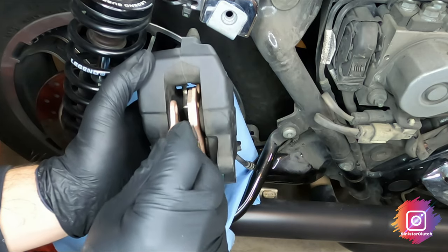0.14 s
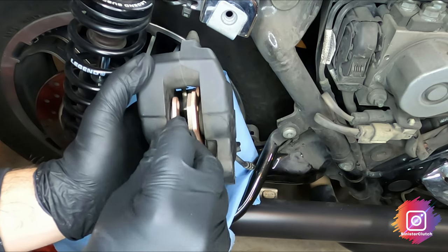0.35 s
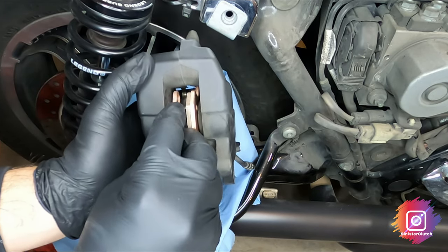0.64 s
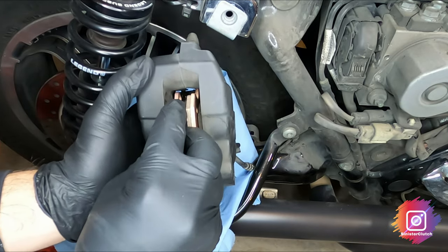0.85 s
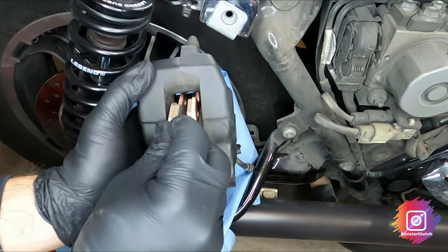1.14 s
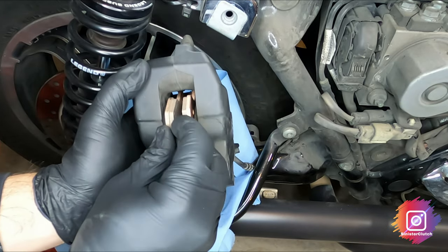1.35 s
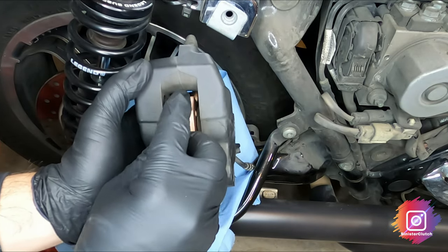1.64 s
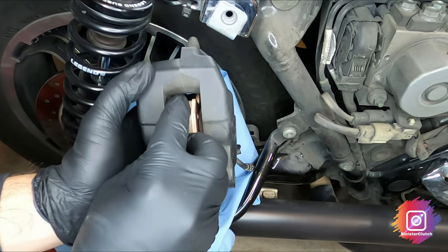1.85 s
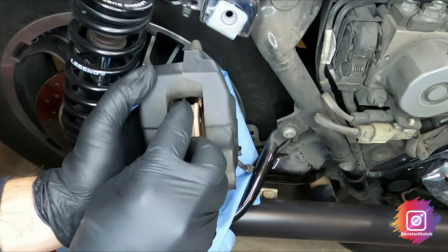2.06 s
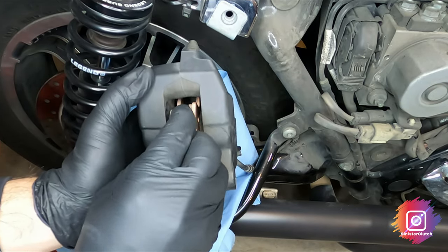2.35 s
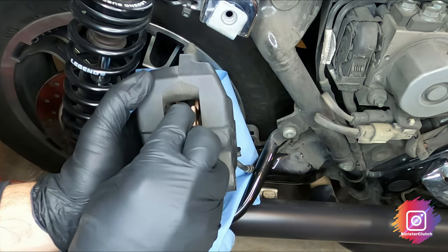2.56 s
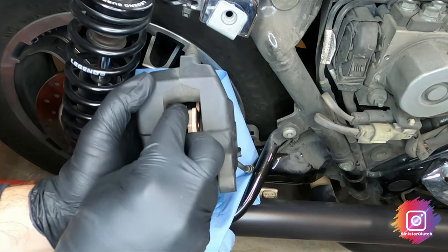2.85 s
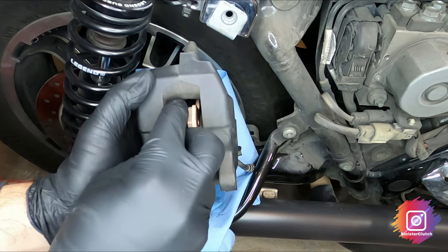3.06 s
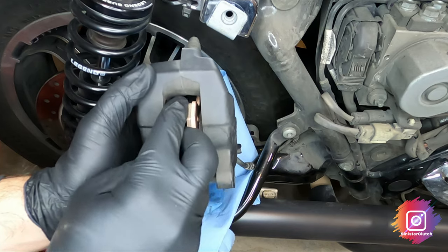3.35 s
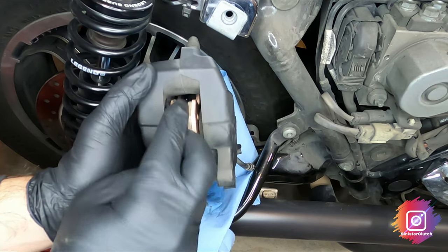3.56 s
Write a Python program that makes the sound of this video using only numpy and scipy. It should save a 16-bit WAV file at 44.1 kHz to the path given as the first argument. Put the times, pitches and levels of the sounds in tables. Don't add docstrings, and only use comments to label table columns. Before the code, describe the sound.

A metal brake pad scrapes and clanks into its caliper, cracks home early, and a spring clip twangs briefly; sparse glove rubs, ticks and soft knocks follow, close-miked in a quiet, faintly humming garage.

```python
import sys
import numpy as np
from scipy import signal
from scipy.fft import rfft, irfft
from scipy.io import wavfile
from scipy.ndimage import uniform_filter1d

SR = 44100
rng = np.random.default_rng(int(sys.argv[2]) if len(sys.argv) > 2 else 0)


def int16_out(signal):
    q = np.round(np.clip(np.atleast_2d(signal).T, -1, 1) * 32767)
    wavfile.write(sys.argv[1], SR, q.astype(np.int16))


def gain_from_db(level_db):
    decades = np.asarray(level_db, float) / 20
    return 10 ** decades


N = 163170
T = np.arange(N) / SR

# (frequency [Hz], density [dB per Hz])
AIR_SPECTRUM = [(25, -4.5), (60, -2), (150, -15), (300, -21.5), (700, -31), (2000, -37), (6000, -41),
                (15000, -45)]
# (frequency [Hz], level [dB], drift [dB/s])
MACHINE_HUM = [(75.4, -60, 0), (99.5, -55, -2), (118.5, -64, 0.82), (144.5, -70.5, 0.22),
               (195.7, -74, -0.34)]
# (time [s], level [dB])
RUMBLE_LEVEL = [(0, -51.5), (.5, -46.5), (.85, -58), (1.35, -38.5), (1.6, -48.5), (2.5, -46.5), (3.0, -39),
                (3.25, -32.5), (3.4, -43.5), (3.55, -36.5), (3.7, -53)]
# (frequency [Hz], width [Hz], level [dB], extra level per pressure [dB/dB])
HELD_PAD_MODES = [(2440, 220, -6.5, 0.4), (3370, 150, -16, 1.5), (5350, 74, -12.5, 1.5),
                  (6590, 110, 7.5, 3), (7900, 82, -1, 1), (8660, 78, -22, -3), (12100, 110, -14, 1),
                  (14000, 210, -24, -2)]
# (time [s], level [dB])
SLIDE_PRESSURE = [(0, -78), (.025, -62), (.05, -72), (.1, -70), (.14, -69), (.16, -60.5), (.18, -67),
                  (.235, -63.5), (.25, -64.5), (.352, -61), (.362, -58), (.402, -57), (.414, -65),
                  (.56, -71), (.7, -70.5), (.76, -63.5), (.79, -68), (.85, -110)]
# (frequency [Hz], level [dB], T60 [s])
FREE_PAD_MODES = [(2500, -41, .07), (3200, -17, 0.078), (3500, -4, 0.051), (4790, -21, .2),
                  (5600, -14.5, 0.056), (6570, 1.5, 0.02), (7585, -5.5, 0.03), (7900, -4, 0.035),
                  (8390, -15.5, 0.13), (9352, -26, 0.17), (10930, -21, 0.15), (12500, -22, .04),
                  (14100, -15, .06)]
# (time [s], crack level [dB], crack centre [Hz], ring level [dB], shim level [dB])
PAD_CLANKS = [
    (0.1435, -54, 2000, -80, -82),
    (0.2018, -66, 2000, -74, -70),
    (0.2158, -40, 2220, -63, -75),
    (0.2945, -49, 2280, -72, -67.5),
    (0.4154, -28.5, 2840, -34, -51.5),
    (0.4227, -38, 1580, -51, -68),
    (1.3128, -37.5, 2300, -80, -61),
    (2.284, -48, 1860, -81, -82),
    (2.6928, -44, 3220, -85, -76),
    (3.696, -46.5, 2160, -83, -61),
]
# (frequency [Hz], width [Hz], level [dB])
SHIM_MODES = [(1150, 940, -9.5), (2530, 740, -6.5), (3270, 210, 3), (3440, 240, 3), (3750, 240, -2),
              (4250, 260, -13)]
# (time [s], frequency
# [Hz], level [dB], T60 [s])
STEEL_RINGS = [(0.1434, 2330, -53.5, 0.069), (.1435, 2000, -61, .15), (.1435, 1360, -64.5, .3),
               (.1435, 6370, -60, 0.046), (.1435, 9000, -66, .1), (.1655, 6260, -62, 0.025),
               (.2017, 2330, -54, .08), (0.202, 1760, -57, 0.025), (.2017, 7900, -72, 0.059),
               (.2017, 5200, -59, .012), (.2156, 2390, -45, 0.032), (.2156, 2020, -59, 0.11),
               (.2165, 6270, -49.5, 0.032), (.2165, 5200, -61, 0.18), (0.2145, 7440, -53, .03),
               (0.295, 5500, -45, 0.018), (.2945, 7900, -56, 0.017), (.2945, 3400, -66, 0.059),
               (.309, 1760, -55, 0.028), (1.3145, 4270, -48, .04), (1.3117, 3360, -48, 0.052),
               (1.312, 7600, -48, 0.022), (1.3125, 2340, -60, 0.026), (1.4105, 13600, -42, 0.012),
               (1.409, 10400, -38, 0.014), (2.6923, 3860, -45, .022), (2.6926, 2630, -45, 0.025),
               (2.6935, 6940, -50, .012), (2.863, 2260, -52.5, .07), (2.862, 1750, -59, .06),
               (2.865, 3460, -65, 0.1), (3.1387, 2990, -39.5, .035), (0.416, 2880, -35, 0.0095),
               (0.4158, 1114, -36, 0.018), (1.3107, 3000, -39, .016), (2.2841, 1040, -54, .02),
               (2.25, 9300, -74, 0.17), (2.225, 4670, -75, .4)]
# (frequency [Hz], level [dB], T60 [s])
CLIP_MODES = [(1924, -5.5, 0.31), (4680, -19, 0.24), (6000, -1, 0.071), (6750, -5, 0.069), (9300, -8, 0.08),
              (10200, -5.5, 0.031)]
# (time [s], level [dB], centre [Hz])
BARE_TICKS = [(.4535, -47, 9800), (0.746, -57.5, 1200), (.977, -58.5, 5800), (1.286, -68, 5600),
              (1.297, -55, 3480), (1.3042, -49.5, 1610), (1.41, -37.5, 5500), (1.4155, -41, 5760),
              (1.4191, -42.5, 5450), (1.4905, -43, 6000), (1.499, -51, 7000), (1.575, -52, 6000),
              (1.6139, -46.5, 5300), (1.653, -43.5, 6350), (2.525, -63, 5500), (2.575, -61, 5500),
              (2.6, -56, 5900), (2.619, -61.5, 6900), (2.648, -59, 7900), (2.758, -60, 12000),
              (2.88, -52.5, 11200), (2.926, -62, 9000), (2.9514, -55.5, 5430), (3.018, -63, 7000),
              (3.3, -64.5, 4300)]
# (frequency [Hz], width [Hz], level [dB])
GLOVE_PEAKS = [(4530, 240, -1), (5270, 180, 21), (5900, 800, 2), (10200, 190, -47)]
# (frequency [Hz], level [dB])
RUB_SPECTRUM = [(800, -24.5), (2000, -12), (4000, -12), (5500, -5.5), (8000, -10.5), (11000, -12.5),
                (14500, -14.5)]
# (time [s], length [s], level [dB], tilt [dB/octave], rising share of length [0-1])
GLOVE_RUBS = [(0.587, 0.16, -68, 6, 0.56), (0.851, 0.041, -57, -2, 0.18), (1.069, 0.025, -63.5, -2, .5),
              (1.085, 0.026, -51.5, 4.5, 0.62), (1.115, 0.033, -64.5, -4, 0.35),
              (1.15, 0.02, -59.5, 3, 0.37), (1.164, 0.037, -65, -4.5, .2), (1.28, 0.031, -56.5, 0.5, 0.56),
              (1.308, 0.028, -60.5, 1, 0.15), (1.37, 0.039, -60.5, 0.5, 1), (1.409, 0.013, -44, 0.5, 0.052),
              (1.419, 0.054, -68, 1, .1), (1.47, 0.04, -52, -2, 0.23), (1.557, 0.028, -53.5, 0.5, 0.46),
              (1.58, 0.029, -60.5, 0.5, 0.48), (1.609, 0.037, -59.5, 0, 0.7),
              (1.642, 0.019, -51, 0.5, 0.63), (2.484, 0.054, -71, -2.5, .3), (2.696, 0.08, -67.5, -5, 0.45),
              (2.735, 0.16, -68, 8.5, 0.51), (2.814, 0.017, -66, 4, 0.56), (3.113, 0.12, -69, 10, 0.28),
              (3.243, 0.068, -70, 6, .4), (3.44, 0.15, -76.5, 5, .5), (3.644, 0.095, -58.5, -0.5, 0.5)]
# (frequency [Hz], width [Hz], level [dB])
CALIPER_MODES = [(1200, 130, -5), (1730, 16, 2), (1920, 300, -2.5), (2330, 94, 3), (2990, 124, -7),
                 (3380, 43, -10.5)]
# (time [s], body level [dB], thud level [dB], centre [Hz])
CALIPER_KNOCKS = [
    (2.8618, -55, -53, 1620),
    (3.1365, -43.5, -45, 2500),
    (3.2086, -49, -45, 2080),
]
# (frequency [Hz], width [Hz], level [dB])
REST_MODES = [(138, 42, -1.5), (214, 32, 1.5), (290, 23, -1), (341, 22, 1.5), (467, 280, -18.5)]
# (frequency [Hz], density [dB per Hz])
SIDE_SPECTRUM = [(18, -8), (30, -3), (120, -20), (270, -7.5), (3150, -21), (8000, -24.5), (14000, -21.5),
                 (15500, -30)]
# (frequency [Hz], gain [dB])
MIC_RESPONSE = [(13500, -0.5), (15000, -6), (15900, -31), (16300, -70)]

AIR_DB, RUMBLE_CORNER_HZ = -57.5, 18.2
GRAINS_PER_S, GRAIN_SPREAD_DB, GRAIN_DECAY_S = 2500, 2, 0.00056
FIRM_PRESSURE_DB, SCUFF_DB, SCUFF_CENTRE_HZ = -57.5, -7, 605
CRACK_T60_S, CRACK_OCTAVES, CRACK_SKIRT_DB = 0.022, 0.79, -12
TICK_T60_S, TICK_OCTAVES, TICK_SKIRT_DB = 0.0076, 0.46, -19
SHIM_T60_S, RING_SCATTER_DB, RING_ATTACK_S = 0.47, 0.5, 0.00071
CLIP_START_S, CLIP_DB, CLIP_ATTACK_S, CLIP_STOP_S = 0.4505, -39.5, 0.0055, 0.06
CLIP_FLAT, CLIP_SETTLE_S = 0.125, 0.0159
CLIP_BEAT_HZ, CLIP_TWIN_GAIN = 14.0, 0.38
KNOCK_T60_S, RATTLE_T60_S, RATTLE_DB, THUD_T60_S = 0.041, 0.4, -7.5, 0.36
ROOM_T60_S, ROOM_DB, SIDE_DB = 0.34, -16, -80


def unit(x):
    return x / np.sqrt(np.mean(x ** 2) + 1e-30)


def shape(table, f):
    p = np.array(table, float)
    return np.interp(np.log(f + 1), np.log(p[:, 0]), p[:, 1])


def track(table):
    return np.interp(T, *np.array(table).T)


def colour(x, db_of):
    f = np.arange(len(x) // 2 + 1) * SR / len(x)
    return unit(irfft(rfft(x) * gain_from_db(db_of(f)), len(x)))


def ring(x, hz, t60):
    r = np.exp(-np.log(1000) / (max(t60, 1e-3) * SR))
    w = 2 * np.pi * hz / SR
    return signal.lfilter([np.sin(w)], [1, -2 * r * np.cos(w), r * r], x)


def body(x, peaks):
    out = 0
    for k, (hz, width_hz, db) in enumerate(peaks):
        t60 = np.log(1000) / np.pi / width_hz
        out = out + (-1) ** k * gain_from_db(db) * width_hz * ring(x, hz, t60)
    return unit(out)


def fade(t, t60):
    return (t >= 0) * gain_from_db(-60 * np.maximum(t, 0) / max(t60, 1e-3))


def walk(rate_hz):
    k = int(SR / rate_hz)
    steps = np.repeat(rng.standard_normal(N // k + 1), k)
    return unit(uniform_filter1d(uniform_filter1d(steps, k), k)[:N])


def add(out, start_s, x):
    i = int(start_s * SR)
    out[i:i + len(x)] += x[:N - i]


def grit():
    size = (rng.random(N) < GRAINS_PER_S / SR) * gain_from_db(GRAIN_SPREAD_DB * rng.exponential(size=N))
    grains = signal.lfilter([1], [1, -np.exp(-1 / (GRAIN_DECAY_S * SR))], size)
    return unit(rng.standard_normal(N) * (2.0 + grains))


def crack(t, hz, t60, octaves, skirt_db, below_db):
    hit = rng.standard_normal(len(t)) * fade(t - .002, t60)
    hit[int(.002 * SR)] += 7

    def spectrum(f):
        away = np.log2((f + 1) / hz)
        skirt = skirt_db - np.where(f > hz, 5, below_db) * away - 60 * (f < 350)
        return np.maximum(-6 * (away / octaves) ** 2, skirt)

    x = colour(hit, spectrum)[int(.0017 * SR):]
    return np.pad(2.79 * x / np.abs(x).max(), (0, len(t) - len(x)))


def garage():
    air = colour(rng.standard_normal(N), lambda f: shape(AIR_SPECTRUM, f) - 40 * (f < 20))
    out = gain_from_db(AIR_DB + .5 * walk(3.8)) * air
    for hz, db, drift_db in MACHINE_HUM:
        level = gain_from_db(db + 1.5 + drift_db * T + 3.8 * walk(5))
        cycles = hz * np.cumsum(1 + 0.0149 * walk(5)) / SR
        out += level * np.sin(2 * np.pi * cycles)
    rumble = colour(rng.standard_normal(N),
                    lambda f: -10 * np.log10(1 + (f / RUMBLE_CORNER_HZ) ** 8) - 30 * (f < 9))
    return out + gain_from_db(track(RUMBLE_LEVEL)) * rumble


def slide():
    friction = grit() * gain_from_db(1.6 * walk(56.2))
    db = track(SLIDE_PRESSURE)
    modes = 0
    for hz, width_hz, mode_db, extra in HELD_PAD_MODES:
        level = gain_from_db(mode_db + max(extra, 0) * (db - FIRM_PRESSURE_DB))
        modes = modes + level * body(friction, [(hz, width_hz, 0)])
    rub = gain_from_db(-18) * colour(friction, lambda f: shape(RUB_SPECTRUM, f))
    scuff = colour(friction, lambda f: -5 * np.log2((f + 1) / SCUFF_CENTRE_HZ) ** 2)
    return gain_from_db(db) * (modes + rub) + gain_from_db(SCUFF_DB + uniform_filter1d(db, size=4000)) * scuff


def steel_rings():
    out, t = np.zeros(N), T[:SR // 2]
    for s, hz, db, t60 in STEEL_RINGS:
        tone = np.sin(2 * np.pi * hz * t) * fade(t, t60)
        add(out, s, gain_from_db(db) * tone * np.minimum(t / RING_ATTACK_S, 1))
    return out


def clanks():
    out, t = np.zeros(N), T[:SR // 2]
    push = 1. * (t == 0)
    for s, db, hz, ring_db, shim_db in PAD_CLANKS:
        add(out, s, gain_from_db(db) * crack(t, hz, CRACK_T60_S, CRACK_OCTAVES, CRACK_SKIRT_DB, 2.3))
        buzz = body(rng.standard_normal(len(t)), SHIM_MODES) * fade(t, SHIM_T60_S)
        add(out, s, gain_from_db(shim_db) * buzz)
        for mode_hz, mode_db, t60 in FREE_PAD_MODES:
            level = gain_from_db(ring_db + mode_db + RING_SCATTER_DB * rng.standard_normal())
            add(out, s, level * ring(push, mode_hz, t60))
    return out


def spring():
    out, t = np.zeros(N), T[:SR // 4]
    x = 0
    for hz, db, t60 in CLIP_MODES:
        flat = CLIP_FLAT * (CLIP_MODES[0][0] / hz) ** 1.26
        bent_s = np.cumsum(1 - flat * np.exp(-t / CLIP_SETTLE_S)) / SR
        twin = CLIP_TWIN_GAIN * (hz < 3000)
        beat = np.abs(1 + twin * np.exp(2j * np.pi * CLIP_BEAT_HZ * t))
        x = x + gain_from_db(db) * beat * fade(t, t60) * np.sin(2 * np.pi * hz * bent_s + 6 * rng.random())
    wobble = gain_from_db(.8 * walk(97)[:len(t)])
    attack = np.minimum(t / CLIP_ATTACK_S, 1)
    finger = np.maximum(fade(np.maximum(t - CLIP_STOP_S, 0), 0.023), gain_from_db(-17))
    add(out, CLIP_START_S, gain_from_db(CLIP_DB) * x * wobble * attack * finger)
    return out


def ticks():
    out, t = np.zeros(N), T[:2000]
    for s, db, hz in BARE_TICKS:
        add(out, s, gain_from_db(db) * crack(t, hz, TICK_T60_S, TICK_OCTAVES, TICK_SKIRT_DB, -1.3))
    return out


def glove():
    out, g = np.zeros(N), grit()
    g = gain_from_db(-13.5) * body(g, GLOVE_PEAKS) + colour(g, lambda f: shape(RUB_SPECTRUM, f))
    for s, length_s, db, tilt_db, rise in GLOVE_RUBS:
        i, n = int(s * SR), int(length_s * SR)
        u = np.arange(min(n, N - i)) / n
        rise = np.clip(rise, .05, .95)
        swell = np.sin(np.pi / 2 * np.minimum(u / rise, (1 - u) / (1 - rise))) ** 0.74
        rub = colour(g[i:i + len(u)], lambda f: tilt_db * np.log2(np.maximum(f, 700) / 6000))
        add(out, s, gain_from_db(db) * swell * rub)
    return out


def caliper():
    out = np.zeros(N)
    for s, db, thud_db, hz in CALIPER_KNOCKS:
        t, noise = T - s, rng.standard_normal(N)

        def broad(octave_db):
            return lambda f: -octave_db * np.log2((f + 1) / hz) ** 2

        decay = fade(t, KNOCK_T60_S) + gain_from_db(RATTLE_DB) * fade(t, RATTLE_T60_S)
        cast = colour(body(noise, CALIPER_MODES), broad(3.1)) * decay
        contact = gain_from_db(-4.5) * colour(noise, broad(6.7)) * fade(t, 0.12)
        out += gain_from_db(db) * (cast + contact) * np.clip(t / 0.00084, 0, 1)
        thud = body(noise, REST_MODES) * fade(t, THUD_T60_S)
        out += gain_from_db(thud_db) * thud * np.clip(t / 0.013, 0, 1)
    return out


def room(near):
    t = T[:SR // 2]
    tail = signal.lfilter([1], [1, -.4], rng.standard_normal(len(t))) * fade(t - .006, ROOM_T60_S)
    return gain_from_db(ROOM_DB) * signal.fftconvolve(near, tail / np.sqrt(np.sum(tail ** 2)))[:N]


def scene():
    near = slide() + steel_rings() + clanks() + spring() + ticks() + glove() + caliper()
    far = room(near) + garage()
    mid = near + far
    side = gain_from_db(SIDE_DB) * colour(rng.standard_normal(N), lambda f: shape(SIDE_SPECTRUM, f))
    side += gain_from_db(-27.0) * np.roll(near, shift=1) + gain_from_db(-47.0) * np.roll(far, shift=900)
    return np.array([mid + side, mid - side])


def top_cut(x):
    return signal.sosfilt(signal.butter(12, 15960, fs=SR, output="sos"), x)


def record(dry):
    response = gain_from_db(shape(MIC_RESPONSE, np.arange(N // 2 + 1) * SR / N))
    heard = irfft(rfft(dry) * response, N)
    return top_cut(heard)


dry = scene()
out = record(dry)
int16_out(out)
```